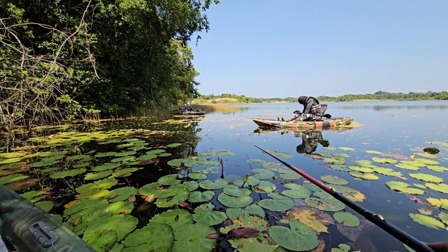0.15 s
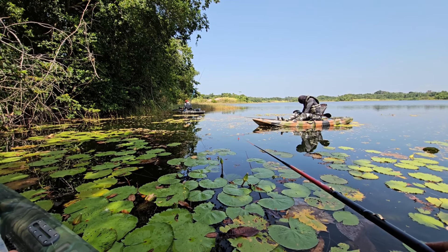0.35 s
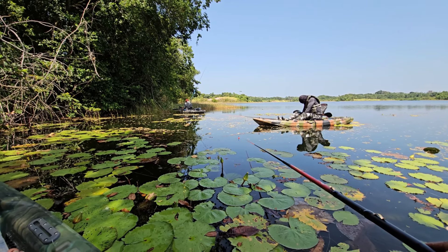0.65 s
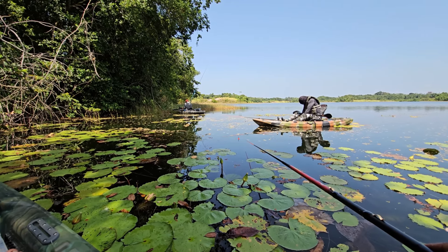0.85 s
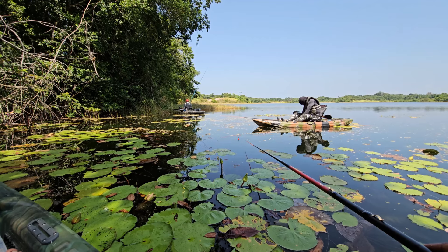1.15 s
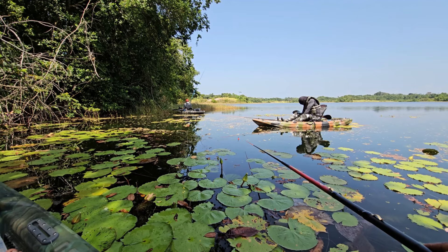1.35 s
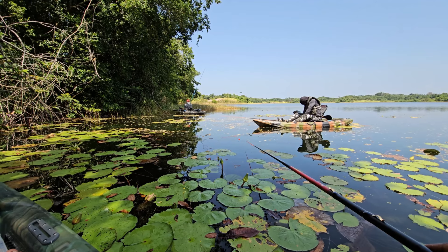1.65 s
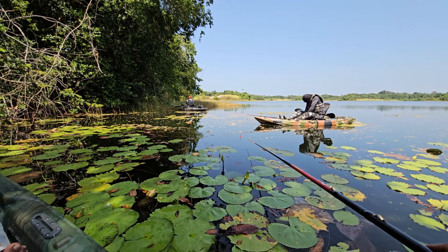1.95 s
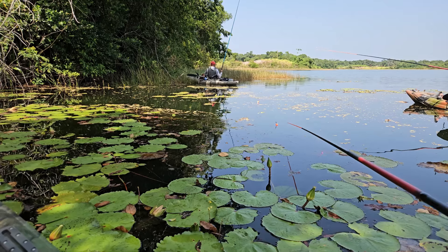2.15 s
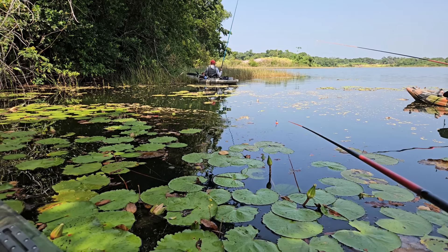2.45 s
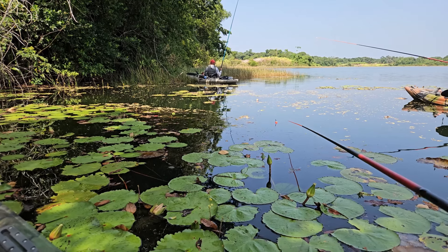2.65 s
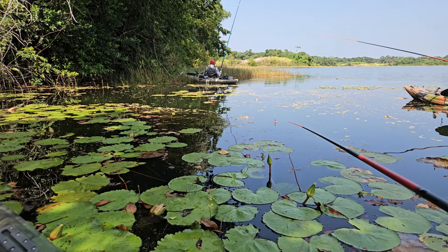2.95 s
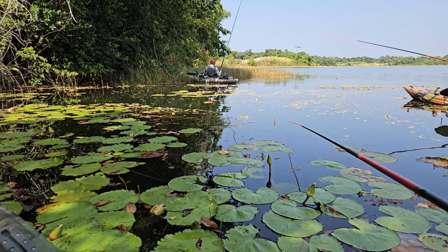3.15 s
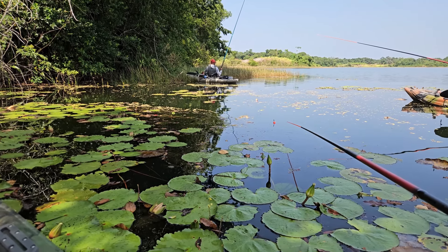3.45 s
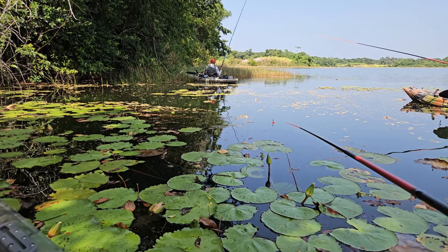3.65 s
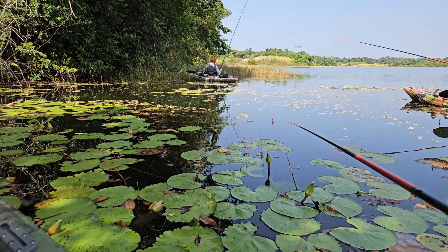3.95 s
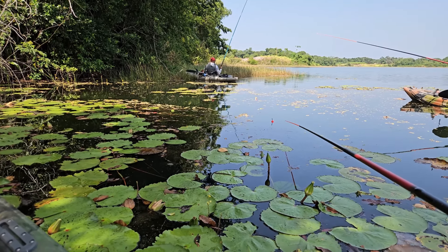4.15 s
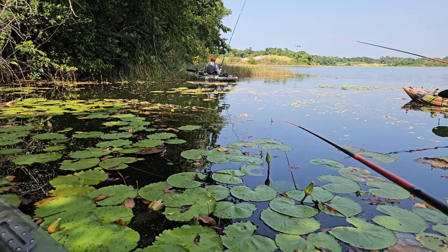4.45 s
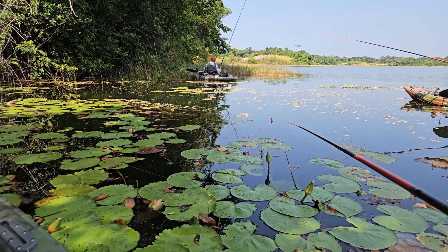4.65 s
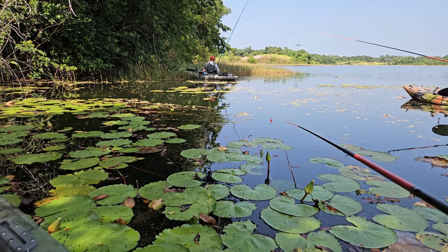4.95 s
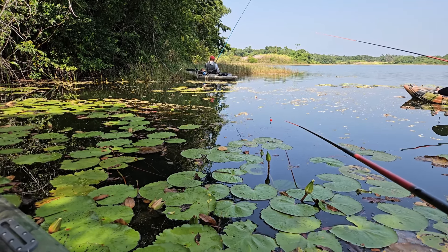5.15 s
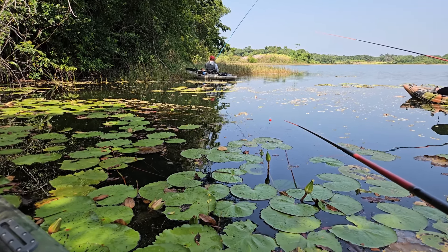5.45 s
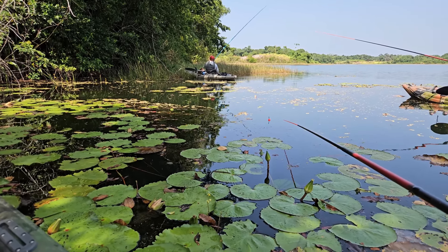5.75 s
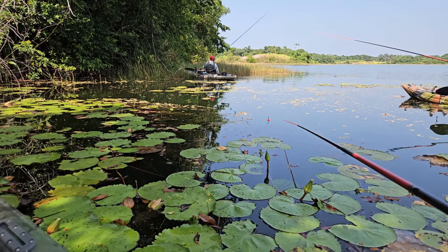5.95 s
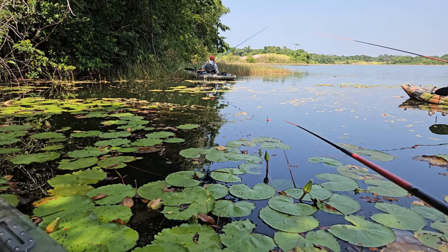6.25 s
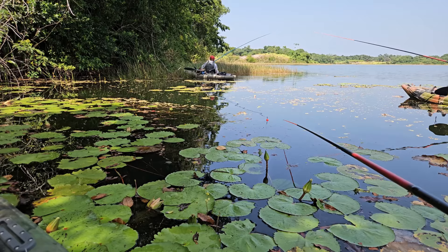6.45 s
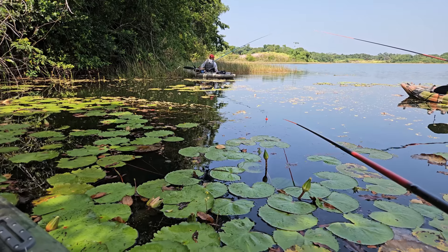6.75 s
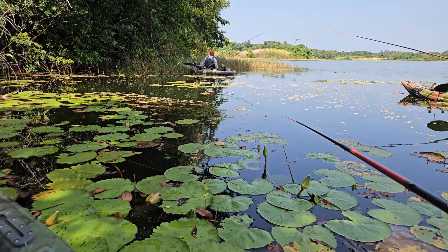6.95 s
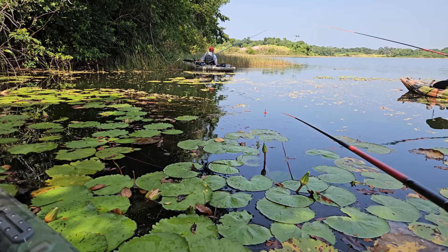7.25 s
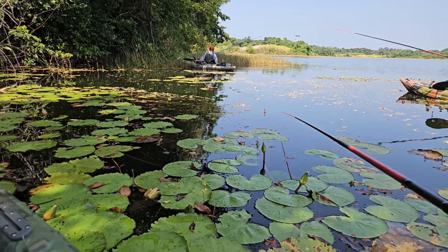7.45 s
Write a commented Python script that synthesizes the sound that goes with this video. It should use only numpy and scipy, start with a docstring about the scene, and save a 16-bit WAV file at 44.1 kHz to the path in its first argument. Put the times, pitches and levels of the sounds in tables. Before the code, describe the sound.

A two-second flurry of booming plastic boat thumps cuts off abruptly, leaving hushed lakeside air, distant chirps, whistles and tiny tackle taps.

```python
"""A hollow plastic kayak hull is knocked close by on a calm lake: damped modes boom, noise bursts crack,
clack and rattle. Direct hull sound ends at a brief drop-out; another comes near the end.
Tackle taps are noise bursts, bumps are low sines; a bee passes twice as wavering wingbeat overtones.
Far birds are gliding tones, insect trills and low hums are noise bands, the lake air is shaped noise;
trees scatter hull and bird sound."""
import sys
import numpy as np
from scipy import signal
from scipy.fft import rfft, irfft
from scipy.io import wavfile
from scipy.ndimage import uniform_filter1d

SR = 44100
rng = np.random.default_rng(int(sys.argv[2]) if len(sys.argv) > 2 else 0)


def wav_out(sig):
    """Save sig, one row per channel (or a flat mono array), as 16-bit PCM at SR to the path in sys.argv[1]."""
    wavfile.write(sys.argv[1], SR, np.round(np.clip(np.atleast_2d(sig).T, -1, 1) * 32767).astype(np.int16))


N = 335248
TIME_S = np.arange(N) / SR

# hull modes: [f/Hz, level/dB, t60/s]
HULL_MODES = [(67, -27.5, 0.25), (105.7, -15.5, 0.34), (134, -8, 0.3), (155.2, -12.5, 0.31),
              (156.8, -2.5, 0.16), (184, -0.5, 0.036), (207.8, -16, 0.33), (231.5, -4.5, 0.048),
              (236.6, -16, 0.29), (278, -8, 0.049), (308, -15, 0.187), (317, -16, 0.088), (364, -6, 0.092),
              (409, -11.5, 0.146), (478, -10.5, 0.079), (546, -25.5, 0.14), (595, -25.5, 0.104),
              (660.6, -23.5, 0.091), (736, -19, 0.064), (792.2, -16, 0.036), (907, -24, 0.068),
              (960, -16.5, 0.014), (1214, -31, 0.09), (1472, -20, 0.012)]
# centres of the mode families: air-filled body, walls, stiff deck [f/Hz]
FAMILY_HZ = [131, 305, 820]
# radiation toward the two ears: [f/Hz, left-right level/dB]
HULL_SIDE = [(60, -2), (130, -0.97), (380, -2.5), (520, -1.5), (750, -1.5), (1100, -3.5)]
# blows; the spot struck sets each family's answer, also played by cracks():
# [t/s, body level/dB, wall level/dB, deck level/dB, crack level/dB]
KNOCKS = [(0.7804, -37, -46, -50, -26), (0.793, -30.5, -32, -53, -23), (0.9277, -15.5, -15, -28.5, -18.5),
          (0.9647, -15, -16.5, -16.5, -7), (0.972, -30, -25.5, -13, -8.5), (1.2508, -7.5, -16, -5, -1),
          (1.2941, -17.5, -18, -20, -13.5), (1.3228, -17.5, -17.5, -9, -13.5), (1.527, -1.5, -3.5, 3, -2),
          (1.6492, -10, -21, -31, -30.5), (1.7881, -26, -31.5, -36, -29), (1.805, -2.5, -1, -1.5, -4),
          (1.876, -26, -31.5, -24, -28.5), (2.0147, -20, -17, -13, -21)]


def hull(lead_s=0.00028, contact_hz=2200, spot_db=0.73):
    """Blows ring one set of damped modes; neighbours swing in opposite senses, so the boom builds for some ms."""
    hz, level_db, t60_s = np.transpose(HULL_MODES)
    sense = (-1.0) ** np.arange(len(hz))
    ear_shift_s = np.array([[-0.5], [0.5]]) * lead_s  # right ear first
    age_s = np.maximum(TIME_S[:SR * 3 // 4] + ear_shift_s, 0)[:, None]
    decay = amp(level_db[:, None] - 60 * age_s / t60_s[:, None])
    modes = decay * np.sin(2 * np.pi * hz[:, None] * age_s)
    modes *= panned(sense, read(HULL_SIDE, hz))[:, :, None]
    out = np.zeros((2, N))
    for t_s, *family_db, _ in KNOCKS:
        answer_db = np.interp(np.log(hz), np.log(FAMILY_HZ), family_db)
        answer_db = answer_db + spot_db * rng.standard_normal(len(hz))
        add(out, t_s, amp(answer_db) @ modes)
    # the contact lasts a moment, so it excites less treble
    return signal.sosfilt(signal.butter(3, contact_hz, fs=SR, output="sos"), out)


# crack of hard contact: [f/Hz, level/dB per Hz]
CRACK_SPECTRUM = [(400, -21.5), (900, 1.5), (1400, -0.5), (1800, -3.5), (2300, -2), (2900, 1), (3900, -0.5),
                  (5000, 0), (6300, -14), (8500, -9.5), (10000, -20), (12500, -13.5), (16000, -23.5)]
# clack: dense upper deck modes, blurred; growth is dB gained per dB of blow
CLACK_HZ, CLACK_OCTAVES, CLACK_T60_S = 1160, 0.65, 0.06
CLACK_DB, CLACK_GROWTH = -29.5, 0.5
# loose fittings: level re crack, longest delay, fall with delay
RATTLE_DB, RATTLE_MAX_S, RATTLE_FALL_DB_PER_S = -21, 0.089, 110.5


def cracks(crack_db=-13, buzz_db=-19, side_db=1.5, dull_db=0.5, light_db=0.7, same=0.43,
           rise_s=0.0015, ear_lag_s=0.00028, ticks=5):
    """Contact snap and deck clack, then fittings buzz and tick; soft or light blows are duller."""
    out = np.zeros((2, N))
    for t_s, body_db, wall_db, deck_db, blow_db in KNOCKS:
        loss_8khz_db = dull_db * np.clip(body_db - blow_db + 4.0, -3, 12) - light_db * blow_db
        colour = lambda hz: read(CRACK_SPECTRUM, hz) - loss_8khz_db * hz / 8000
        level_db = crack_db + blow_db

        right, other = burst(colour, t60_s=0.017, rise_s=rise_s)
        burst_s = TIME_S[:len(right)]
        late = np.interp(burst_s - ear_lag_s, burst_s, right)
        snap = np.array([alike(late, other, same), right])
        buzz = burst(colour, t60_s=0.1)
        contact = amp(level_db) * (snap + amp(buzz_db) * buzz)
        add(out, t_s + 0.00044, panned(contact, side_db))

        clack_db = CLACK_DB + CLACK_GROWTH * (wall_db + deck_db) / 2
        add(out, t_s, amp(clack_db) * burst(hump(CLACK_HZ, CLACK_OCTAVES), CLACK_T60_S))
        for delay_s in RATTLE_MAX_S * rng.random(ticks):
            tick_db = level_db + RATTLE_DB - RATTLE_FALL_DB_PER_S * delay_s
            add(out, t_s + delay_s, amp(tick_db) * burst(colour, t60_s=0.012))
    return out


# light tackle taps: [t/s, level/dB, centre f/Hz, width/octaves, t60/s, left-right level/dB]
TAPS = [(4.092, -53, 883, 0.35, 0.03, 11), (4.695, -34, 487, 0.97, 0.013, 5),
        (5.833, -46, 8350, 0.4, 0.0099, -9), (7.3462, -34.5, 2900, 0.76, 0.0045, 20),
        (7.3485, -40.5, 2830, 0.89, 0.0077, 14)]
# soft boat bumps: [t/s, level/dB, f/Hz]
BUMPS = [(2.221, -50.5, 60.3), (2.43, -49, 75), (2.945, -43.5, 110), (4.698, -41, 67.3), (7.288, -53.5, 70)]


def tackle(bump_cycles=5, bump_side_db=14.5):
    """Taps are short noise bursts; bumps are sines that fall 60 dB in bump_cycles."""
    out, age_s = np.zeros((2, N)), TIME_S[:SR // 2]
    for t_s, level_db, centre_hz, octaves, t60_s, side_db in TAPS:
        tap = burst(hump(centre_hz, octaves), t60_s)
        add(out, t_s, panned(amp(level_db) * tap, side_db))
    for t_s, level_db, hz in BUMPS:
        decay = amp(level_db - 60 * age_s * hz / bump_cycles)
        bump = -decay * np.sin(2 * np.pi * hz * age_s)
        add(out, t_s, panned(bump, bump_side_db))
    return out


# wingbeat overtones: [multiple of wingbeat, level/dB]
WING_OVERTONES = [(1, 15.5), (2, 6.5), (3, -23.5), (4, -3.5), (5, 1.5), (6, -8.5), (7, -9), (8, -19),
                  (9, -15.5), (10, -14)]
# bee passes: [nearest t/s, wingbeat there f/Hz, level/dB, approach/s, retreat/s]
BEE_PASSES = [(4.356, 229.9, -73.5, .05, .12), (5.454, 206.4, -60.5, .01, 0.063)]


def bee(cruise_hz=210, falloff_power=1.32, side_db=-2, waver=0.008, lag_s=0.00018,
        bright_db_per_octave_hz=0.17, flutter_db=2.5, weave_hz=1.1):
    """Wingbeats swell with nearness; faster beats are brighter; the path shifts the delay between the ears."""
    hz, gain = np.full(N, float(cruise_hz)), np.zeros(N)
    for near_s, near_hz, level_db, approach_s, retreat_s in BEE_PASSES:
        span_s = np.where(TIME_S < near_s, approach_s, retreat_s)
        nearness = 1 / np.hypot(1, (TIME_S - near_s) / span_s)
        hz = hz + (near_hz - cruise_hz) * nearness ** 2
        gain = gain + amp(level_db) * nearness ** falloff_power
    slow = uniform_filter1d(rng.standard_normal((2, N)), size=700)
    wobble, flutter = evened(uniform_filter1d(slow, size=700))
    turns = np.cumsum(hz * (1 + waver * wobble)) / SR
    ear_lag_s = np.array([[0.5], [-0.5]]) * lag_s * np.sin(2 * np.pi * weave_hz * TIME_S)
    turns = turns + hz * ear_lag_s
    tilt_db = bright_db_per_octave_hz * (hz - hz.min())  # per octave
    wings = np.zeros((2, N))
    for k, level_db in WING_OVERTONES:
        overtone = np.cos(2 * np.pi * round(k) * turns)
        wings += amp(level_db + tilt_db * np.log2(k)) * overtone
    return panned(wings * gain * amp(flutter_db * flutter), side_db)


# songbird whistles, one pitch arch each: [t/s, length/s, top f/Hz, level/dB]
WHISTLES = [(2.0, 0.09, 4730, -66), (2.545, 0.25, 4550, -65), (2.826, 0.12, 4470, -66),
            (4.86, 0.095, 4080, -74), (4.95, .11, 4490, -68), (5.02, 0.23, 5150, -75),
            (5.25, 0.12, 4130, -70), (7.22, .19, 4080, -74.5)]
# second bird's falling chips: [t/s, start f/Hz, level/dB]
CHIPS = [(2.208, 2420, -67.5), (2.583, 2420, -63), (2.797, 2980, -64), (5.858, 2360, -64.5),
         (6.25, 2390, -62.5)]
# far bird's falling coo: [t/s, f/Hz, level/dB]
COO = [(0, 616, -59.5), (.12, 564, -53), (.16, 486, -61.5), (.25, 452.6, -59.5), (.34, 440, -77)]
# drop and sag: share of pitch lost; power: roundness of the arch top
ARCH_DROP, ARCH_POWER, WHISTLE_SIDE_DB = 0.12, 2, 10.5
CHIP_S, CHIP_SAG, CHIP_SIDE_DB = 0.04, 0.065, 5.5
COO_SIDE_DB = -5.5


def birds():
    """Gliding tones: arched whistles, short falling chips and one low coo."""
    out = np.zeros((2, N))
    for t_s, length_s, top_hz, level_db in WHISTLES:
        from_top = abs(np.linspace(-1, 1, int(length_s * SR)))
        pitch_hz = top_hz * (1 - ARCH_DROP * from_top ** ARCH_POWER)
        add(out, t_s, note(pitch_hz, level_db, WHISTLE_SIDE_DB, fade=0.22))
    for t_s, start_hz, level_db in CHIPS:
        pitch_hz = start_hz * (1 - CHIP_SAG * np.linspace(0, 1, int(CHIP_S * SR)))
        add(out, t_s, note(pitch_hz, level_db, CHIP_SIDE_DB))
    point_s, point_hz, point_db = np.transpose(COO)
    t_s = np.arange(point_s[0], point_s[-1], 1 / SR)
    pitch_hz, level_db = np.interp(t_s, point_s, point_hz), np.interp(t_s, point_s, point_db)
    add(out, point_s[0], note(pitch_hz, level_db, COO_SIDE_DB, octave_db=-33, fade=0.065))
    return out


SHORE_LAG_S = 0.00045  # left ear later; also used by air()


def note(hz, level_db, side_db, octave_db=-17.0, fade=0.45):
    """Nearly pure tone along a pitch curve, with a weak octave; the left ear hears it later."""
    lag_s = np.array([[SHORE_LAG_S], [0]])
    phase = 2 * np.pi * (np.cumsum(hz) / SR - lag_s * hz)
    tone = np.sin(phase) + amp(octave_db) * np.sin(2 * phase)
    return panned(amp(level_db) * tone * signal.windows.tukey(len(hz), fade), side_db)


# insect trills in the reeds, blurred by distance: [t/s, length/s, f/Hz, level/dB]
TRILLS = [(1.108, 0.14, 2900, -68), (1.474, 0.052, 3000, -58.5), (1.541, 0.17, 3000, -65),
          (2.57, 0.45, 5150, -81), (4.199, 1.33, 3146, -74), (4.375, 0.1, 6700, -66),
          (4.85, 0.43, 4910, -71), (6.66, 0.16, 2860, -74)]
# low far hums: [t/s, length/s, f/Hz, level/dB]
HUMS = [(3.33, 0.18, 461, -65.5), (4.571, 0.071, 261, -61), (5.115, .3, 267, -60.5),
        (6.719, 0.48, 264, -68), (7.362, 0.15, 206, -64.5)]
# left-right likeness, also used by air(): [f/Hz, correlation]
LIKENESS = [(60, .72), (300, 0.4), (640, 0.1), (1400, 0.06), (4500, 0.21), (15000, 0.05)]


def trills(band_share=0.088):
    """Narrow noise bands, width a share of pitch, flutter by themselves as they swell and fade."""
    out, hz = np.zeros((2, N)), np.fft.rfftfreq(2 * SR, 1 / SR)
    for t_s, length_s, centre_hz, level_db in TRILLS + HUMS:
        band = np.exp(-2 * ((hz / centre_hz - 1) / band_share) ** 2)
        noise = evened(irfft(rfft(rng.standard_normal((2, 2 * SR))) * band))
        left, other = noise[:, :int(length_s * SR)]
        pair = np.array([left, alike(left, other, read(LIKENESS, centre_hz))])
        add(out, t_s, amp(level_db) * evened(pair) * signal.windows.tukey(len(left), 0.6))
    return out


# low murmur: [t/s, level/dB]
MURMUR = [(0.7, -5), (2.0, 3), (3.2, 0.5), (5.5, 1), (6.5, -2), (7.6, .5)]


def air(spectrum, level_db, patchy_db=1.0, hiss_side_db=2, low_side_db=-1):
    """Shaped noise: lake murmur and insect hiss drift in patches; the left ear hears the hiss later."""
    frames, hz = N // 256 + 5, np.fft.rfftfreq(1024, 1 / SR)
    a, b, c, d, patches = rng.standard_normal((5, frames, 513))
    patches = evened(uniform_filter1d(uniform_filter1d(patches, 16, 0), 8, 1))
    same = read(LIKENESS, hz)
    left, other = a + 1j * b, c + 1j * d
    hiss, high = hz > 900, hz / (hz + 1500)
    lag = np.exp(-2j * np.pi * hz * SHORE_LAG_S * hiss)
    z = np.array([left * lag, alike(left, other, same)])
    z *= amp(read(spectrum, hz) + patchy_db * patches) / np.sqrt(1 + same * ~hiss)
    murmur_db = np.interp(np.arange(frames) * 256 / SR, *np.transpose(MURMUR))
    z *= amp(np.outer(murmur_db, 1 - high))
    z *= panned(1, low_side_db * (1 - high) + hiss_side_db * high)[:, None]
    sound = signal.istft(z.transpose(0, 2, 1), nperseg=1024, noverlap=768)[1]
    return amp(level_db) * evened(sound[:, :N])


# ring of the shore and its trees: [f/Hz, t60/s]
SHORE_RING = [(100, .5), (500, 0.2), (1500, .35), (4000, 0.31), (12000, 0.22)]


def shore(x, delay_s):
    """Scatter from the trees: sparse random taps, each band dying at its own speed."""
    sparse = rng.standard_normal((2, SR)) * (rng.random((2, SR)) < 0.1)
    taps = sparse * (TIME_S[:SR] > delay_s)
    hz, t_s, z = signal.stft(taps, SR, nperseg=256)
    decay = amp(-60 * t_s / read(SHORE_RING, hz)[:, None])
    tail = signal.istft(z * decay, SR, nperseg=256)[1]
    return signal.fftconvolve(x, tail / np.linalg.norm(tail[0]), axes=1)[:, :N]


def burst(colour_db, t60_s, rise_s=0.0014, size=8192):
    """Dying burst of coloured noise, independent at each ear."""
    hz, t_s = np.fft.rfftfreq(size, 1 / SR), np.arange(size) / SR
    noise = evened(irfft(rfft(rng.standard_normal((2, size))) * amp(colour_db(hz))))
    return noise * amp(-60 * t_s / t60_s) * (1 - np.exp(-t_s / rise_s))


def hump(centre_hz, octaves):
    """Rounded dB spectrum about one frequency."""
    return lambda hz: -4 * (np.log2((hz + 1) / centre_hz) / octaves) ** 2


def alike(first, other, same):
    """Blends two independent signals to correlation same with the first."""
    return same * first + np.sqrt(1 - same ** 2) * other


def amp(db):
    """Decibels to gain."""
    return 10 ** (np.asarray(db) / 20)


def evened(x):
    """Scales to rms 1."""
    return x / np.sqrt(np.mean(x ** 2) + 1e-20)


def read(points, hz):
    """Reads a curve on a log-frequency axis."""
    f, value = np.transpose(points)
    return np.interp(np.log(hz + 1), np.log(f + 1), value)


def panned(x, side_db):
    """Splits a sound between left and right by a level difference."""
    return x * amp(np.array([[0.5], [-0.5]]) * side_db)


def add(mix, t_s, sound):
    """Mixes a stereo sound in at t_s."""
    start = round(t_s * SR)
    sound = sound[:, max(-start, 0):]
    part = mix[:, max(start, 0):][:, :sound.shape[1]]
    part += sound[:, :part.shape[1]]


# shore air before and after the first drop-out: [f/Hz, level/dB per Hz]
AIR_EARLY = [(15, -46), (25, -9.5), (126, -0.5), (227, -15.5), (253, -1.5), (322, -3.5), (469, -8),
             (598, -10.5), (895, -20), (1240, -21.5), (4870, -20), (6210, -22.5), (7500, -35),
             (12200, -36.5), (15500, -32)]
AIR_LATE = [(15, -71), (25, -4), (129, -2), (183, -6.5), (260, -1.5), (349, -10), (445, -4.5), (495, -13),
            (631, -9.5), (848, -18), (1050, -18), (7500, -18.5), (9550, -38.5), (11800, -33.5),
            (15500, -32.5)]
# silences, also used by record(): [start t/s, end t/s]
DROPOUTS = [(2.065, 2.107), (7.492, 7.556)]


def scene():
    """Near boat almost dry, birds with more shore; direct hull sound stops at the first drop-out."""
    boom, crack, song = hull(), cracks(), birds()
    to_shore = amp(-38.5) * boom + amp(-24.5) * crack + amp(-11) * song
    early = TIME_S < DROPOUTS[0][0]
    lake = np.where(early, air(AIR_EARLY, level_db=-56), air(AIR_LATE, level_db=-60.5))
    near = (boom + crack) * early + tackle() + bee()
    return near + song + trills() + shore(to_shore, delay_s=0.023) + lake


def record(dry, edge_hz=15850):
    """Two short drop-outs, soft overload near full scale, and the band limit."""
    live = 1.0 - sum((TIME_S > start_s) & (TIME_S < end_s) for start_s, end_s in DROPOUTS)
    out = dry * uniform_filter1d(live, size=8)
    out = out / (1 + out ** 10) ** (1 / 10)
    lowpass = signal.firwin(511, edge_hz, window=("kaiser", 9), fs=SR)
    return signal.oaconvolve(out, lowpass[None], "same")


dry = scene()
out = record(dry)
wav_out(out)
```